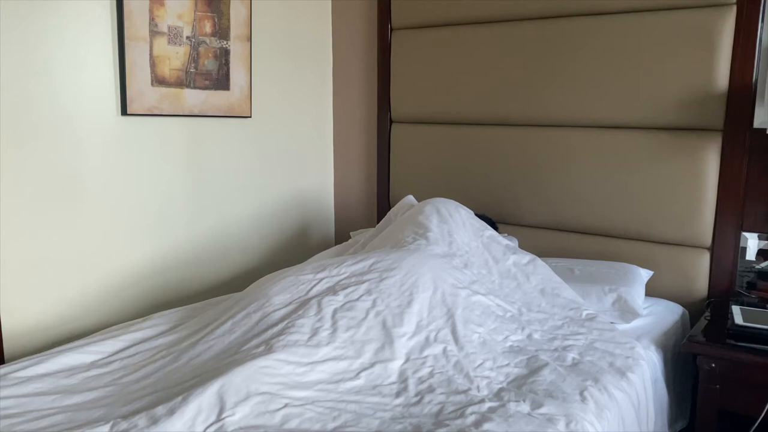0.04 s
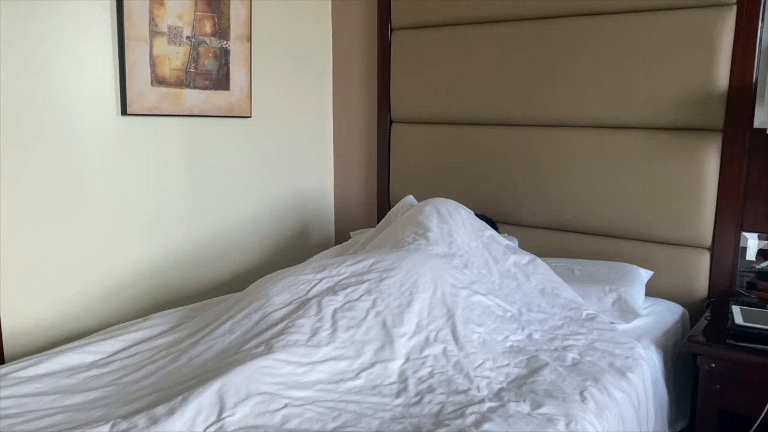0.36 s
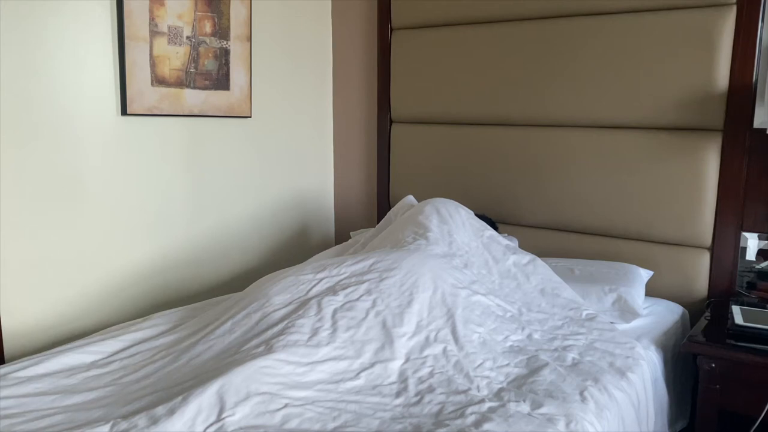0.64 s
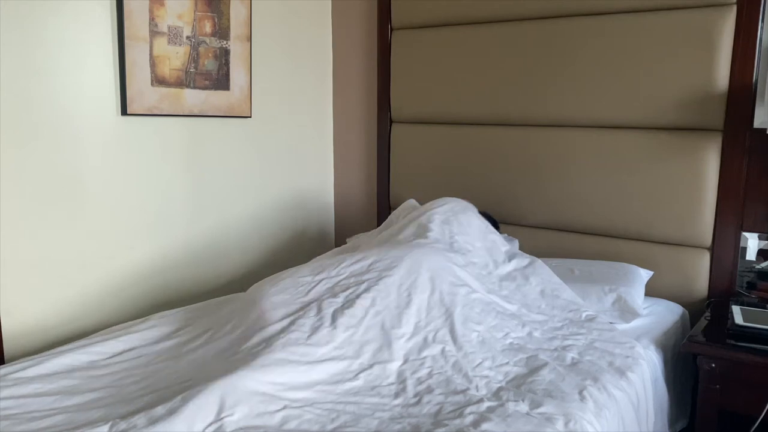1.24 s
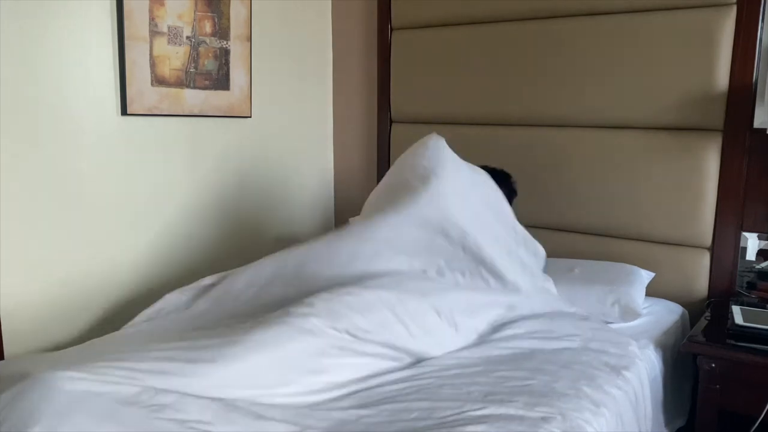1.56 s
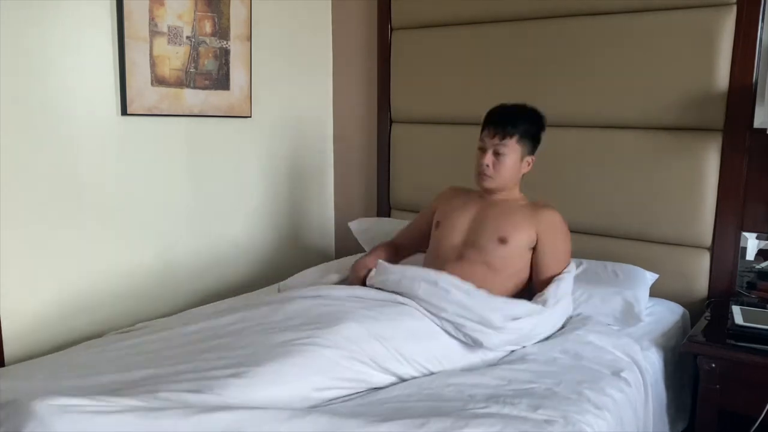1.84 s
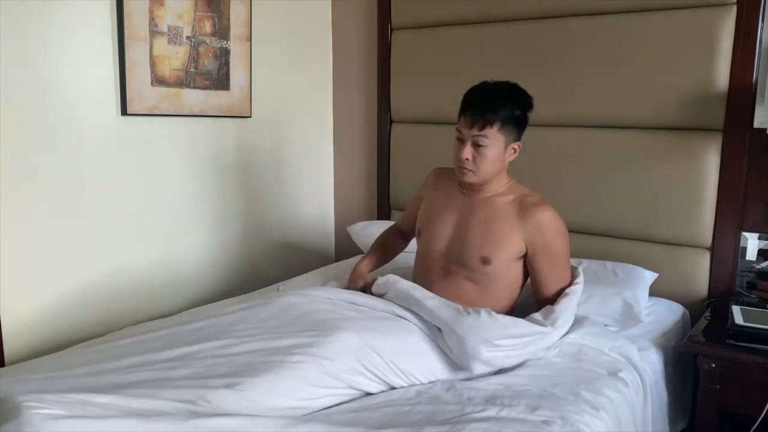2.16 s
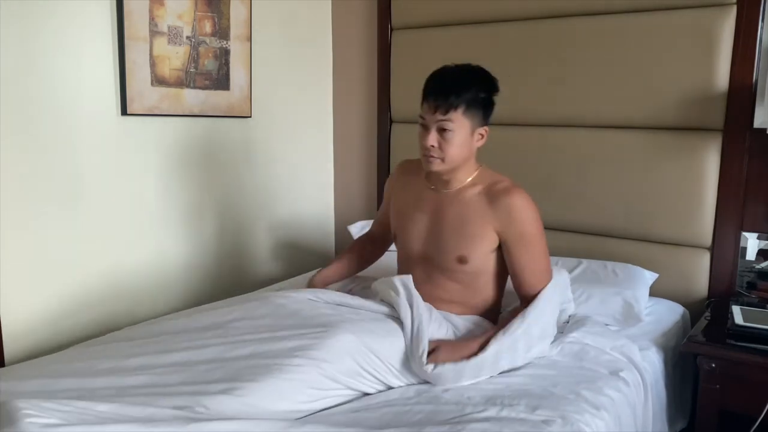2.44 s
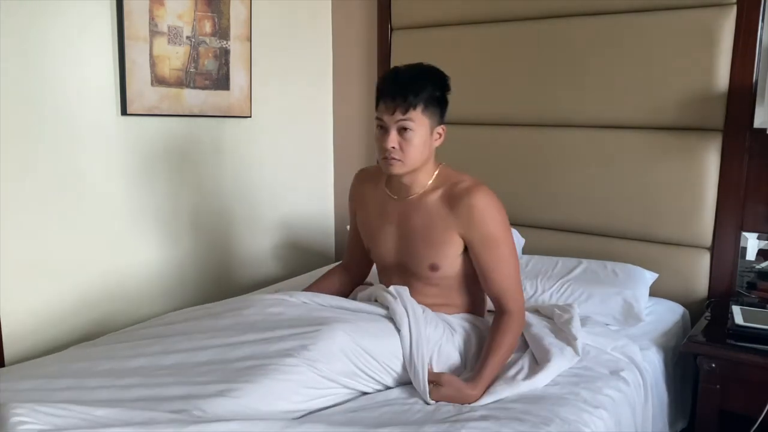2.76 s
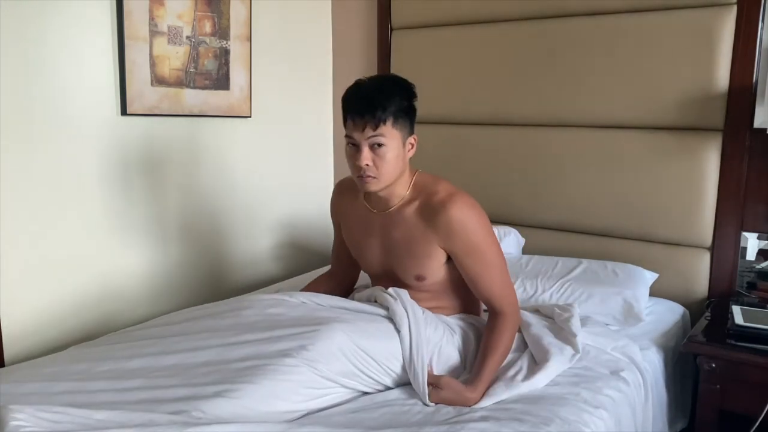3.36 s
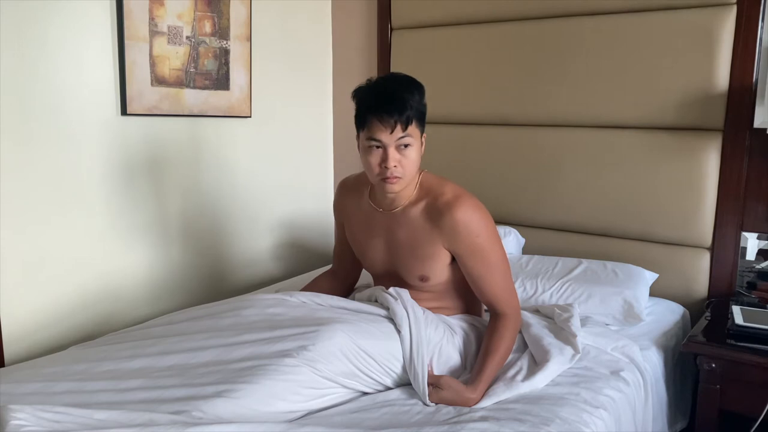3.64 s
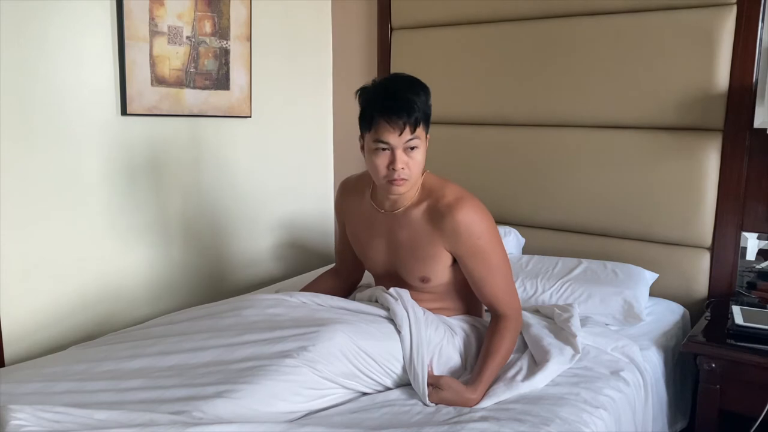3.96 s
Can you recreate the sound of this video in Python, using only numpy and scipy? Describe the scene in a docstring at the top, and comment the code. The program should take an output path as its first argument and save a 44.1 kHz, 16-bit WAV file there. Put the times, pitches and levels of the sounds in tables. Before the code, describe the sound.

Bedding rustles and flaps in two quick swings as someone pushes it off, followed by a softer hiss of sliding cloth. Behind it, a low, steady air conditioner hum fills a small, quiet bedroom.

```python
"""A cotton duvet is thrown back in a small, quiet bedroom, then slides and settles as someone sits up.
Cloth on cloth hisses in countless tiny slips, folds buckle and flap,
and the moved air booms in the room's low mode.
An air conditioner hums and blows throughout, a little to the left."""
import sys
import numpy as np
from scipy import signal
from scipy.fft import rfft, irfft
from scipy.io import wavfile

SR = 44100
rng = np.random.default_rng(int(sys.argv[2]) if len(sys.argv) > 2 else 0)


def inscribe(sig):
    """Save sig as 16-bit PCM at rate SR to the path in sys.argv[1].

    A 1-D sig is mono; a 2-D sig holds one channel per row.
    Samples are clipped to [-1, 1] before scaling.
    """
    pcm = np.round(np.clip(np.atleast_2d(sig).T, -1, 1) * 32767)
    wavfile.write(sys.argv[1], SR, pcm.astype(np.int16))


N = 176400
T = np.arange(N) / SR
HZ = np.maximum(np.arange(N // 2 + 1) * SR / N, 1)

# cloth, sound common to both channels: f/Hz, power share/1
CLOTH_COHERENCE = [(100, 0.67), (300, 0.82), (700, 0.31), (3000, 0.039), (7000, 0.021), (8500, 0.32),
                   (10000, 1), (14000, 1)]
# cloth, lean to the left: f/Hz, L-R/dB
CLOTH_LEAN_DB = [(100, 2), (350, 2), (700, 7), (2300, 1.5), (4400, 6), (8500, 0.5)]


def undb(db):
    """Decibels to gain."""
    return 10 ** (np.asarray(db) / 20)


def unit(x):
    """Scale to rms 1."""
    return x / np.sqrt(np.mean(x ** 2))


def over_hz(points):
    """Interpolate (f/Hz, value) points over log frequency."""
    hz, value = np.array(points, float).T
    return np.interp(np.log(HZ), np.log(hz), value)


def walk(rate_hz):
    """Slow random drift, rms 1."""
    return unit(irfft(rfft(rng.standard_normal(N)) * np.exp(-(HZ / rate_hz) ** 2), N))


def band(hz, width_hz):
    """Noise in a Gaussian band, rms 1."""
    return unit(irfft(rfft(rng.standard_normal(N)) * np.exp(-.5 * ((HZ - hz) / width_hz) ** 2), N))


def grains(per_s, spread_db):
    """Three independent click streams, sizes spread exponentially in dB."""
    size = undb(spread_db * np.minimum(rng.exponential(size=(3, N)), 5))
    sign = rng.choice([-1, 1], (3, N))
    return unit(size * sign * (rng.random((3, N)) < per_s / SR))


def swells(rows):
    """Sum of bell envelopes, each with its own rise and fall."""
    return sum(undb(db) * np.exp(-.5 * ((T - t_s) / np.where(T < t_s, rise_s, fall_s)) ** 2)
               for t_s, rise_s, fall_s, db in rows)


def left(lean_db):
    """Channel gains for a lean to the left."""
    return undb(lean_db * np.array([[.5], [-.5]]))


def ports():
    """Phase factors of the two microphone ports."""
    # f/Hz, lead of left/rad
    lead_rad = [(0, 0), (340, .5), (1000, 2.9), (4390, 12.5), (7000, 20), (8200, 22), (10050, 18.85),
                (12200, 15.7), (15200, 11)]
    return np.exp(-1j * np.interp(HZ, *np.array(lead_rad).T) * np.array([[0], [1]]))


def room_response(ripple_db=2, spacing_hz=22):
    """Room resonances plus a fine ripple from wall reflections, different per channel."""
    # resonances: f/Hz, width/Hz, gain/dB
    modes = [(170, 14, 3), (273.5, 32, 3.5), (389, 20, 1), (588, 18, 3), (720.4, 20, 6), (815, 31, 1),
             (926, 32, 3.5), (988, 18, 2), (1230, 26, -4.5)]
    modes_db = sum(db / (1 + (2 * (HZ - hz) / width_hz) ** 2) for hz, width_hz, db in modes)
    knots_hz = np.arange(0, SR / 2, spacing_hz)
    draws = rng.standard_normal((2, N // 8))[:, :len(knots_hz)]
    ripple = np.array([np.interp(HZ, knots_hz, row) for row in draws])
    cepstrum = irfft(np.log(undb(modes_db + ripple_db * ripple)), N)
    # positive times only: resonances ring after their excitation
    return np.exp(rfft(cepstrum * (1 + np.sign(T)) * (T < T[-1] / 2)))


def room_tail(x, t60_s=0.29, tail_db=-4.5):
    """Add the short tail of a softly furnished room to each stream."""
    t_s = T[:SR // 2]
    tail = rng.standard_normal((len(x), len(t_s))) * undb(-60 * t_s / t60_s) * (t_s > .004)
    tail /= np.sqrt(np.sum(tail ** 2, axis=1, keepdims=True))
    return x + undb(tail_db) * signal.fftconvolve(x, tail, axes=1)[:, :N]


def place(streams, colour_db, coherence, lean_db):
    """Mix one common and two independent streams to coloured stereo in the room."""
    spectra = rfft(streams)
    share = np.clip(over_hz(coherence), 0, 1)
    pair = np.sqrt(share) * spectra[0] * ports() + np.sqrt(1 - share) * spectra[1:]
    return irfft(pair * unit(undb(over_hz(colour_db))) * left(over_hz(lean_db)) * room_response(), N)


def air_conditioner(draught_db=-53.5, wander_db=.4):
    """Steady draught, motor hum and a narrow, restless rumble."""
    # draught spectrum: f/Hz, relative density/dB
    colour_db = [(20, -30.5), (31, -14.5), (43, 6), (70, -4.5), (95, 4), (112, -2), (155, 1.5), (220, -4.5),
                 (300, -11), (390, -7), (500, -12.5), (680, -14), (870, -9.5), (1100, -15), (1600, -24),
                 (2200, -33.5), (3200, -42), (6000, -48), (8500, -51), (11500, -56), (15000, -63)]
    # draught common to both channels: f/Hz, power share/1
    coherence = [(100, 1), (250, 0.56), (500, 0.1), (1000, 0.67), (2000, 0.12), (7000, 0), (10000, 1)]
    # draught lean: f/Hz, L-R/dB
    lean_db = [(100, 4.5), (280, 1), (600, 4.5), (1400, 3.5), (2100, 3), (4000, 5), (6500, 8.5), (9000, 0)]
    # motor tones: f/Hz, level/dB, wander/dB
    tones = [(119.54, -52.5, 1.3), (60.6, -58, 2.5)]
    # rumble envelope: t/s, level/dB
    rumble_db = [(0, -74), (.5, -54), (.85, -63), (2.1, -55), (2.6, -56.5), (3.1, -56.5), (3.6, -50.5),
                 (4, -53.5)]
    draught = place(rng.standard_normal((3, N)), colour_db, coherence, lean_db)
    hum = 0
    for hz, db, drift_db in tones:
        amplitude = np.sqrt(2) * undb(db + drift_db * walk(10))
        hum += amplitude * np.sin(2 * np.pi * hz * T + 0.067 * walk(8.4))
    rumble = band(hz=62, width_hz=15) * undb(np.interp(T, *np.array(rumble_db).T))
    draught *= undb(draught_db + wander_db * walk(6.7))
    return draught + hum * left(lean_db=-0.7) + rumble * left(lean_db=2.0)


def booms():
    """Moved air swells and dies in the room's low mode."""
    # pushes of air and mattress: centre t/s, half length/s, f/Hz, peak/dB
    pushes = [(0.957, 0.015, 60.7, -44), (1.057, 0.083, 66, -42.5), (1.225, 0.047, 59, -43),
              (1.354, 0.027, 62, -40), (1.42, 0.043, 69, -40.5), (1.483, 0.038, 62.5, -38.5),
              (1.584, 0.014, 66.6, -35), (1.632, 0.018, 65.4, -30.5), (1.774, 0.035, 58.3, -35.5),
              (1.894, 0.055, 59, -42.5), (2.018, 0.034, 63.5, -42), (2.919, 0.023, 58.6, -39)]
    boom = 0
    for t_s, half_s, hz, db in pushes:
        envelope = undb(db) * np.exp(-((T - t_s) / half_s) ** 2)
        boom += envelope * np.sin(2 * np.pi * (hz * (T - t_s) + rng.random()))
    return boom * left(lean_db=1.5)


def sliding(flutter_db=0.56, split_hz=3900, tilt_db_per_db=0.2054, neutral_db=-63):
    """Dense thread slips merge into a fluttering hiss, brighter when fast."""
    # hiss envelope: t/s, level before tilt/dB
    slide_db = [(1.12, -86.5), (1.16, -73), (1.21, -59), (1.26, -55.5), (1.33, -56), (1.41, -56.5),
                (1.48, -60.5), (1.54, -60), (1.61, -58), (1.67, -56.5), (1.76, -63.5), (1.93, -66),
                (2.01, -70.5), (2.10, -66), (2.22, -71.5), (2.32, -67.5), (2.41, -64), (2.52, -64.5),
                (2.61, -67), (2.65, -74), (2.73, -78), (2.80, -79), (3.05, -89)]
    # hiss spectrum: f/Hz, relative density/dB
    colour_db = [(150, -28), (500, 7.5), (1200, 6), (2400, 3), (4500, -2.5), (6500, -4), (8200, -7),
                 (11300, -4.5), (13000, -10), (15000, -17)]
    level_db = np.interp(T, *np.array(slide_db).T, left=-130, right=-130) + flutter_db * walk(30)
    slips = grains(per_s=9000, spread_db=-1)
    hiss = place(slips, colour_db, CLOTH_COHERENCE, CLOTH_LEAN_DB)
    treble = irfft(rfft(hiss) / (1 + (split_hz / HZ) ** 4), N)
    tilt = undb(tilt_db_per_db * np.maximum(level_db - neutral_db, -10))
    return undb(level_db) * (treble * tilt + (hiss - treble) / tilt)


def brushes():
    """Patches of sheet swish past: a light touch hisses high, a pressed one rasps lower."""
    # swishes: peak t/s, rise/s, fall/s, level/dB, f/Hz, width/Hz
    patches = [(1.225, 0.039, 0.08, -66.5, 11100, 2200), (1.28, 0.045, 0.074, -64, 5800, 1900),
               (1.602, 0.0026, 0.005, -59.5, 11000, 2200), (2.0, 0.13, 0.23, -76, 11900, 2200),
               (2.47, 0.07, 0.06, -77, 2600, 600)]
    swish = sum(swells([gesture]) * band(hz, width_hz) for *gesture, hz, width_hz in patches)
    return irfft(rfft(swish) * ports() * left(over_hz(CLOTH_LEAN_DB)), N)


def folds():
    """Each swing of the duvet buckles many folds with dull pops."""
    # duvet swings: peak t/s, rise/s, fall/s, level/dB
    swings = [(1.29, 0.051, 0.048, -54), (1.365, 0.05, 0.068, -50.5), (1.596, 0.026, 0.016, -45.5),
              (1.66, 0.0069, 0.027, -45.5), (1.92, 0.075, 0.068, -62), (2.42, 0.59, 0.29, -70)]
    # pop spectrum: f/Hz, relative density/dB
    colour_db = [(70, -8), (150, -3.5), (210, -6.5), (280, 0.5), (360, -4), (520, -7.5), (700, -10.5),
                 (1100, -14), (1600, -22.5), (2600, -29), (6000, -40)]
    pops = swells(swings) * grains(per_s=640, spread_db=3)
    return place(room_tail(pops), colour_db, CLOTH_COHERENCE, CLOTH_LEAN_DB)


def flaps(decay_cycles=0.76, snap_decay_s=0.01):
    """Cloth snaps taut or lands, shoving air for a cycle or two; big slack folds sound lower."""
    # flaps: t/s, push level/dB, f/Hz, snap level/dB
    hits = [(1.326, -32, 332, -48), (1.361, -44, 563, -64), (1.399, -32.5, 270, -52),
            (1.575, -50, 515, -66), (1.594, -35, 460, -55), (1.604, -47, 900, -51.5),
            (1.622, -30.5, 148, -75), (1.644, -28.5, 350, -56), (1.672, -39, 380, -66),
            (1.693, -39, 201, -55)]
    snap = band(hz=1190, width_hz=430)
    push = np.zeros(N)
    for t_s, db, hz, snap_db in hits:
        age_s = np.maximum(T - t_s, 0)
        push += undb(db) * np.sin(2 * np.pi * hz * age_s) * np.exp(-hz * age_s / decay_cycles)
        push += undb(snap_db) * snap * (age_s > 0) * np.exp(-age_s / snap_decay_s)
    spectra = rfft(room_tail(np.array([push, push])))
    return irfft(spectra * ports() * left(over_hz(CLOTH_LEAN_DB)) * room_response(), N)


def scene():
    """Bedding over the air conditioner."""
    return air_conditioner() + booms() + sliding() + brushes() + folds() + flaps()


def record(dry, fade_s=.012, top_hz=15200):
    """Fade both ends and cut the top."""
    fade = np.sin(np.pi / 2 * np.clip(np.minimum(T, T[-1] - T) / fade_s, 0, 1)) ** 2
    return signal.sosfilt(signal.ellip(10, .1, 70, top_hz, fs=SR, output="sos"), dry * fade)


dry = scene()
out = record(dry)
inscribe(out)
```